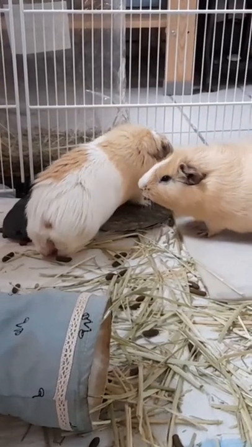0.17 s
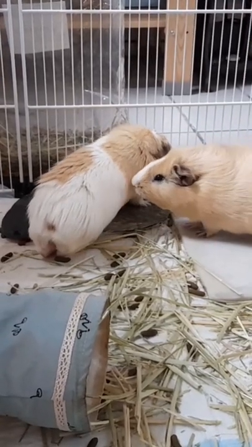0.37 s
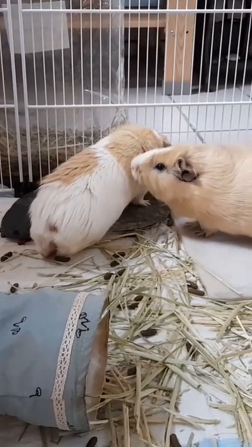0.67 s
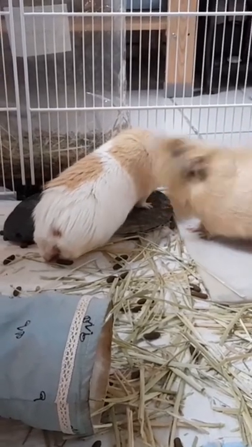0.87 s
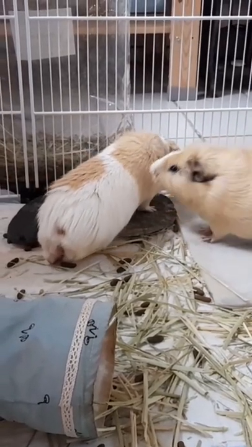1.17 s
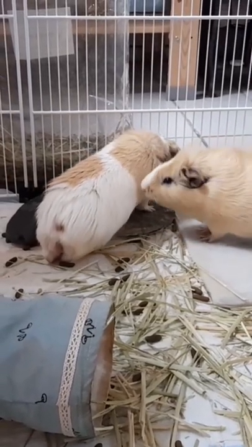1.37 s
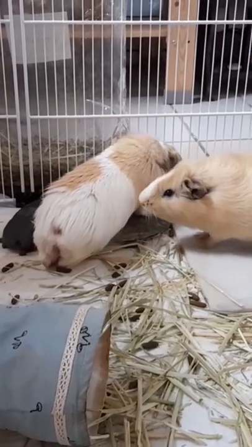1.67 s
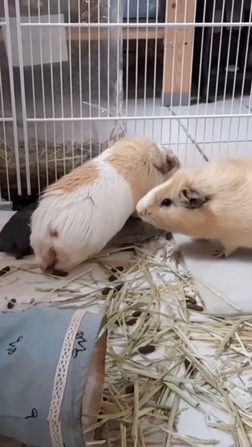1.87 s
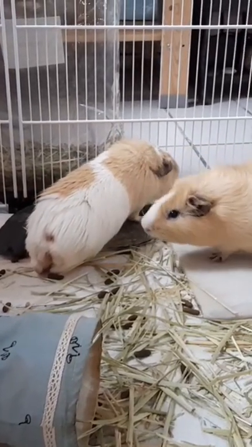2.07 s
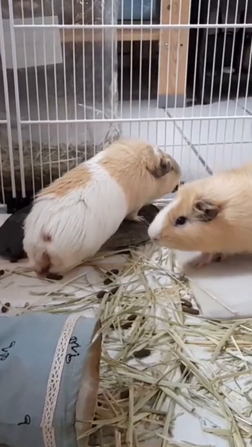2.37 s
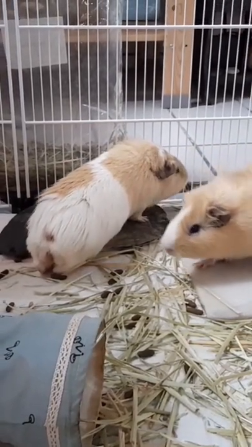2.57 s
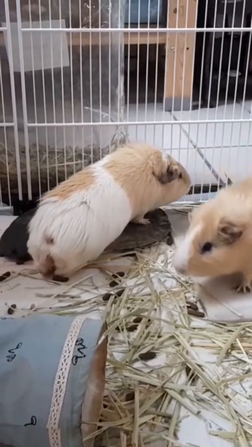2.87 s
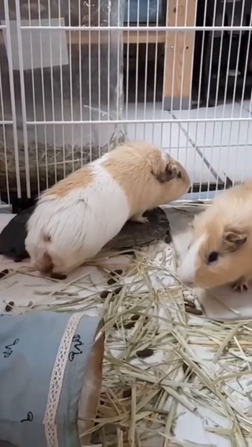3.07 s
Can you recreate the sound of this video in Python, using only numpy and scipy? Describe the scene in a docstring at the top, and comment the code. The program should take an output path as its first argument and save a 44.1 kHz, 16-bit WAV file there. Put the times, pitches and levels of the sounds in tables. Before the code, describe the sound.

A guinea pig purrs from the start, about fifteen short low throbs a second, each rising slightly in pitch, with light room echo. Soft paw thumps fall near 0.1 and 0.6 s. Around 1 s hay crackles faintly and the purr pauses, resuming softly near 1.35 s and continuing to the end. Faint thumps come at 2.3 and 3.1 s, with a brief rustle at 3.1 s, over quiet hum, rumble and hiss.

```python
"""A guinea pig purrs in a wire cage, about fifteen short voiced throbs a second, each rising in pitch.
An appliance hums and the room rumbles throughout; the microphones add steady hiss. Soft paw thumps fall
early on; near one second hay crackles as the purr pauses for breath. The purr resumes, with later thumps
and a second rustle near the end. Tones and breath noise make the purr, shaped noise the room, tiny
random crackles the hay, and short low tones the thumps."""
import sys
import numpy as np
from scipy import signal
from scipy.fft import rfft, irfft, next_fast_len
from scipy.io import wavfile

SR = 44100
rng = np.random.default_rng(int(sys.argv[2]) if len(sys.argv) > 2 else 0)


def to_linear_factor(level_db):
    """Convert decibel levels (scalar or array-like) to linear amplitude factors."""
    exponent = np.asarray(level_db, float) / 20
    return 10 ** exponent


def persist_wave(psi):
    """Save psi, clipped to +-1, as 16-bit WAV."""
    counts = np.round(np.clip(psi, -1, 1) * 32767).astype(np.int16)
    wavfile.write(sys.argv[1], SR, np.atleast_2d(counts).T)


N = 141561  # samples
LEAD_IN = 4410  # samples of lead-in, so that the first throb can begin before the start

# likeness of left and right microphone, for room noise and hay: hz, likeness (0-1)
LIKENESS = [(60, .82), (130, .72), (290, .85), (640, .44), (1400, .02), (4400, .05), (5800, .25),
            (7500, .76), (14900, .86)]


def evened(x):
    """Scales to rms 1."""
    return x / np.sqrt(np.mean(x ** 2) + 1e-20)


def read(points, hz):
    """Reads a table on a log-frequency axis."""
    f, value = np.transpose(points)
    return np.interp(np.log(hz + 1), np.log(f + 1), value)


def colour(x, table):
    """Filters by a table of hz, gain_db."""
    size = next_fast_len(x.shape[-1] + 4096)
    gain = to_linear_factor(read(table, np.fft.rfftfreq(size, 1 / SR)))
    return irfft(rfft(x, size) * gain, size)[..., :x.shape[-1]]


def late(x, s):
    """Delays by s seconds."""
    at = np.arange(len(x))
    return np.interp(at - s * SR, at, x, left=0)


def slow(top_hz):
    """Random drift of rms 1, low-passed at top_hz."""
    drift = signal.lfilter(*signal.butter(2, top_hz, fs=SR), rng.standard_normal(2 * N))
    return evened(drift[N:])


def bump(t, rise_s, fall_s):
    """Smooth swell that peaks at t = 0, with its own rise and fall."""
    return np.exp(-(t / np.where(t < 0, rise_s, fall_s)) ** 2)


def room_floor():
    """Rumble and hiss: random short-time spectra, partly shared by the two microphones."""
    # spectrum of rumble and hiss: hz, relative_density_db
    spectrum = [(15, -72), (25, -44), (50, -52), (65, -2.5), (113, -6.5), (155, -8.5), (193, -22.5),
                (225, -28), (300, -12.5), (400, -14), (600, -22.5), (914, -34), (1890, -43), (2400, -47.5),
                (4000, -51), (7040, -52.5), (11000, -47.5), (15400, -42.5)]
    # balance of the microphones: hz, left_minus_right_db
    tilt = [(60, -4.5), (130, -1), (1000, -1.5), (4400, -2), (8000, -1.5)]
    level_db = -49.5  # rms over both channels
    frames, hz = N // 1024 + 6, np.fft.rfftfreq(4096, 1 / SR)
    a, b, c, d = rng.standard_normal((frames, 2049, 4)).T
    same = np.clip(read(LIKENESS, hz), -1, 1)[:, None]
    first_noise, own_noise = a + 1j * b, c + 1j * d
    z = np.array([first_noise, same * first_noise + np.sqrt(1 - same ** 2) * own_noise])
    balance_db = np.multiply.outer([.5, -.5], read(tilt, hz))[:, :, None]
    z *= to_linear_factor(read(spectrum, hz)[:, None] + balance_db)
    noise = signal.istft(z, nperseg=4096, noverlap=3072)[1][:, 2048:N + 2048]
    return to_linear_factor(level_db) * evened(noise)


def room_tones():
    """Rumble caught in the lowest room resonances: tones with randomly drifting strength and phase."""
    # resonances: hz, width_hz, level_db (rms, midway between left and right)
    resonances = [(67.22, 7.6, -56.5), (95.17, 11.6, -57.5), (144.4, 10.3, -63)]
    t = np.arange(N) / SR
    out = np.zeros(N)
    for hz, width_hz, level_db in resonances:
        turn = 2 * np.pi * hz * t
        tone = slow(width_hz) * np.cos(turn) + slow(width_hz) * np.sin(turn)
        out += to_linear_factor(level_db) * evened(tone)
    return out * to_linear_factor(np.c_[[-1.5, 1.5]])  # dB left, right


def hum():
    """Mains hum of an appliance: steady tones whose level wavers slightly."""
    # hum tones: multiple, level_db (rms before the waver, midway between left and right), left_minus_right_db
    tones = [(1, -61, 0), (2, -51.5, 1)]
    base_hz, waver_db, waver_top_hz = 119.9, 2.16, 3.3
    t = np.arange(N) / SR
    out = np.zeros((2, N))
    for multiple, level_db, pan_db in tones:
        level = to_linear_factor(level_db + np.c_[[.5, -.5]] * pan_db - waver_db * slow(waver_top_hz))
        out += np.sqrt(2) * level * np.sin(2 * np.pi * (multiple * base_hz * t + rng.random()))
    return out


def hay():
    """Hay rustles: dense tiny crackles under quick rises and short decays."""
    # rustles: start_s, level_db (before the split by brightness), rise_s, t60_s, brightness (0-1)
    rustles = [(0.962, -60, 0.0026, 0.17, 0.4), (0.971, -57, 0.0068, 0.18, 0.5),
               (1.001, -66, 0.01, 0.32, 0.1), (1.045, -70.5, .025, .45, 0.54),
               (3.099, -61, 0.0033, .09, 0.95), (3.112, -72.5, .012, 0.61, .85)]
    # tone of the dull crackle: hz, relative_db
    dull_tone = [(1000, -17), (1900, 4), (3000, -7), (4300, -7), (5900, -5.5), (6700, -3), (7600, -22),
                 (13900, -18.5), (16000, -36)]
    # tone of the bright crackle: hz, relative_db
    bright_tone = [(2500, -52), (4200, -11), (6200, 0), (7500, -3), (10500, -3), (16000, -16.5)]
    grains_per_s, spread_db = 35000, 4.5
    t = np.arange(N) / SR
    size = to_linear_factor(spread_db * np.minimum(rng.exponential(1, (2, N)), 5)) * rng.standard_normal((2, N))
    grains = size * (rng.random((2, N)) < grains_per_s / SR)
    # the right microphone hears part of the left's grains and part of its own
    hz, same = np.transpose(LIKENESS)
    same = np.clip(same, .01, .999)
    shared = np.c_[hz, 20 * np.log10(same)]
    own = np.c_[hz, 10 * np.log10(1 - same ** 2)]
    grains = np.array([grains[0], colour(grains[0], shared) + colour(grains[1], own)])
    power = np.zeros((2, N))  # dull, bright
    for start_s, level_db, rise_s, t60_s, brightness in rustles:
        fall_db = 60 * np.maximum(t - start_s - rise_s, 0) / t60_s
        envelope = to_linear_factor(level_db - fall_db) * np.clip((t - start_s) / rise_s, 0, 1)
        power += np.clip(np.c_[[1 - brightness, brightness]], 0, 1) * envelope ** 2
    dull = evened(colour(grains, dull_tone)) * np.sqrt(power[0])
    bright = evened(colour(grains, bright_tone)) * np.sqrt(power[1])
    return dull + bright


def thumps():
    """Soft thumps, as of paws on the cage floor: a few cycles of low tone under a smooth bump."""
    # thumps: centre_s, envelope_peak_db, pitch_hz, length_s (from the centre down to 1/e)
    hits = [(.085, -41, 77, 0.039), (.588, -35.5, 80, 0.011), (2.33, -40.5, 70, .035),
            (3.07, -37, 100, 0.011), (3.168, -37.5, 88.6, 0.0072)]
    t = np.arange(N) / SR
    out = np.zeros(N)
    for centre_s, peak_db, hz, length_s in hits:
        out += to_linear_factor(peak_db) * bump(t - centre_s, length_s, length_s) * np.sin(2 * np.pi * hz * (centre_s - t))
    return out


def purr():
    """Each throb is a short rising voiced burst; breath noise roughens the overtones."""
    # throbs: end_s, lowest_tone_db, top_pitch_hz (before jitter), octave_db, overtones_db (before colouring)
    throbs = [(0.005, -26.5, 286.7, -46, -44), (0.075, -30.5, 275, -52, -48.5),
              (0.134, -29.5, 315.8, -47, -53.5), (0.207, -26, 290.3, -44.5, -53),
              (0.273, -31.5, 298, -48, -51.5), (0.336, -28.5, 284.5, -44.5, -49.5),
              (0.398, -25, 283.2, -46, -49), (0.463, -25, 282.8, -47, -46), (0.527, -26, 275.3, -48, -47),
              (0.59, -29, 301.7, -48, -48.5), (0.656, -27, 299.7, -44.5, -48.5),
              (0.721, -25.5, 276, -46, -50.5), (0.787, -23.5, 279.7, -46, -48), (0.857, -27, 286, -50, -49),
              (0.917, -28, 300.3, -49.5, -50.5), (0.975, -30.5, 299.3, -55, -56.5),
              (1.03, -48.5, 278.8, -80, -64.5), (1.375, -32.5, 294.2, -63, -82),
              (1.439, -33, 307.4, -53.5, -66.5), (1.504, -30, 299.7, -49.5, -57.5),
              (1.569, -29.5, 286.7, -55, -56), (1.633, -27.5, 293.3, -49.5, -50.5),
              (1.697, -28, 293.8, -46.5, -50.5), (1.767, -28.5, 287, -44, -48.5),
              (1.833, -30, 286, -51.5, -49.5), (1.902, -28, 296.5, -47, -52.5),
              (1.967, -27, 295.4, -51, -48), (2.035, -27.5, 294.2, -47, -48),
              (2.1, -25.5, 299, -45.5, -49.5), (2.17, -26, 289.8, -46, -49),
              (2.233, -26, 315.2, -46.5, -52), (2.302, -27, 293, -47, -53.5),
              (2.379, -26, 296.2, -45.5, -54), (2.448, -29, 295, -50.5, -55.5),
              (2.514, -27.5, 304.6, -48.5, -57), (2.582, -27.5, 286.2, -45, -52),
              (2.654, -29.5, 308, -47.5, -52.5), (2.723, -26.5, 292.1, -45, -51.5),
              (2.797, -27, 280.8, -45, -56), (2.873, -28, 298.9, -50.5, -58),
              (2.946, -27.5, 307.7, -48, -56), (3.018, -28.5, 299, -50, -54.5),
              (3.093, -28.5, 297.7, -49, -57), (3.16, -27.5, 289.4, -46.5, -54)]
    # colour of lowest tone and octave: hz, gain_db
    chest = [(200, -19.5), (252, -9), (275, 0), (310, 2), (370, -2.5), (450, -8.5), (530, -2), (610, 3),
             (670, 8), (740, -19)]
    # colour of the overtones through the throat: hz, gain_db
    throat = [(400, 10), (620, 7.5), (760, -4.5), (920, -2), (1010, -4.5), (1140, -4), (1300, -11.5),
              (1550, -12.5), (1750, -20), (2100, -20), (2500, -30), (3200, -39.5)]
    throb_s, pitch_start, jitter = 0.02707, .78, .03  # pitch starts at a share of its top
    swell_s, release_s, shoulder_db = 0.0059, 0.0034, -11.5  # lowest tone peaks as the throb ends
    octave_early_s, octave_rise_s, octave_fall_s = 0.003, .011, 0.0042  # octave peaks just before the end
    buzz_rise_s, buzz_fall_s, buzz_early_s = 0.0035, 0.0065, 0.0019  # overtones start to fade just before the end
    rough, puff_turns, puff_db = .2, .35, 25  # breath escapes early in each cycle
    low, high = np.zeros((2, N + LEAD_IN))
    wobble, breath = np.tile(slow(120), 2), rng.standard_normal(N + LEAD_IN)
    for end_s, low_db, top_hz, octave_db, high_db in throbs:
        at = LEAD_IN + np.arange(round((end_s - .05) * SR), min(round((end_s + .03) * SR), N))
        t = (at - LEAD_IN) / SR - end_s
        progress = np.clip(1 + t / throb_s, 0, 1)
        pitch_hz = top_hz * (pitch_start + (1 - pitch_start) * progress) * (1 + jitter * wobble[at])
        turns = rng.random() + np.cumsum(pitch_hz) / SR
        on = np.clip((t + throb_s) / buzz_rise_s, 0, 1)
        # a quiet shoulder holds the lowest tone up ahead of its peak
        shoulder = to_linear_factor(shoulder_db) * on * (t < 0)
        low_shape = np.maximum(bump(t, swell_s, release_s), shoulder)
        low[at] += to_linear_factor(low_db) * low_shape * np.cos(2 * np.pi * turns)
        octave = bump(t + octave_early_s, octave_rise_s, octave_fall_s)
        low[at] += to_linear_factor(octave_db) * octave * np.cos(4 * np.pi * turns)
        folds = sum(np.cos(2 * np.pi * k * turns) for k in range(3, 11))
        puffs = np.exp(-(turns % 1) / puff_turns) * breath[at] * to_linear_factor(puff_db)
        off = np.exp(-(np.maximum(t + buzz_early_s, 0) / buzz_fall_s) ** 2)
        high[at] += to_linear_factor(high_db) * on * off * ((1 - rough) * folds + rough * puffs)
    return colour(low, chest) + colour(high, throat)


def room(x):
    """A few echoes off cage and walls, a ringing resonance, and a tail of sparse taps dying by band."""
    # purr at the left microphone against the right: hz, gain_db
    left_colour = [(200, -11), (250, -6.5), (290, -16.5), (340, -8), (420, 2.5), (600, 1), (900, -5.5),
                   (1300, -3.5), (2400, -6.5)]
    # early echoes before colour and lag: left_delay_s, right_delay_s, left_db, right_db
    echoes = [(.007, 0.008, -18, -10.5), (.017, 0.027, 0, -17.5), (.029, .036, -8.5, -19)]
    # decay time of the tail: hz, t60_s
    decay = [(200, 0.38), (500, 0.5), (1200, 0.75), (3000, 0.31)]
    # likeness of the tail at left and right: hz, likeness (0-1)
    tail_likeness = [(250, 1), (600, 0.74), (1200, .1), (2500, 0.073)]
    # tail gain before the left colour: left_db, right_db
    tail_db = [-8, -9]
    ring_hz, ring_width_hz, ring_db = 270, 8, -4  # a room resonance that the lowest tone keeps ringing
    right_lag_s = 0.0002
    taps = np.zeros((2, SR // 2))
    at = np.arange(400, SR // 2 - 20, 20)
    at = at + rng.integers(0, 20, (2, len(at)))
    np.put_along_axis(taps, at, rng.choice([-1., 1.], at.shape), 1)
    hz, t, z = signal.stft(taps, SR, nperseg=1024)
    same = np.clip(read(tail_likeness, hz), 0, 1)[:, None]
    z[0] = same * z[1] + np.sqrt(1 - same ** 2) * z[0]
    fade = to_linear_factor(-60 * t / read(decay, hz)[:, None])
    tail = signal.istft(z * fade, SR, nperseg=1024)[1]
    tail = tail / np.linalg.norm(tail[1])
    wet = signal.fftconvolve(x[None], tail, axes=1)[:, :len(x)] * to_linear_factor(np.c_[tail_db])
    wet += to_linear_factor(ring_db) * signal.lfilter(*signal.iirpeak(ring_hz, ring_hz / ring_width_hz, SR), x)
    left, right = x + wet
    for left_s, right_s, left_db, right_db in echoes:
        left = left + to_linear_factor(left_db) * late(x, left_s)
        right = right + to_linear_factor(right_db) * late(x, right_s)
    return np.array([colour(left, left_colour), late(right, right_lag_s)])


def scene():
    """The room and its appliance, hay and paws, and the purr in the room."""
    background = room_floor() + room_tones() + hum()
    return background + hay() + thumps() + room(purr())[:, LEAD_IN:]


def top_cut(x):
    """Nothing passes above the cut-off."""
    return signal.sosfilt(signal.butter(12, 15500, fs=SR, output="sos"), x)


def record(dry):
    """Limits the top of the band and returns the finished recording."""
    edge_hz = 15500
    lowpass = signal.firwin(511, edge_hz, window=("kaiser", 9), fs=SR)
    mix = signal.oaconvolve(dry, lowpass[None], "same")
    return top_cut(mix)


dry = scene()
out = record(dry)
persist_wave(out)
```